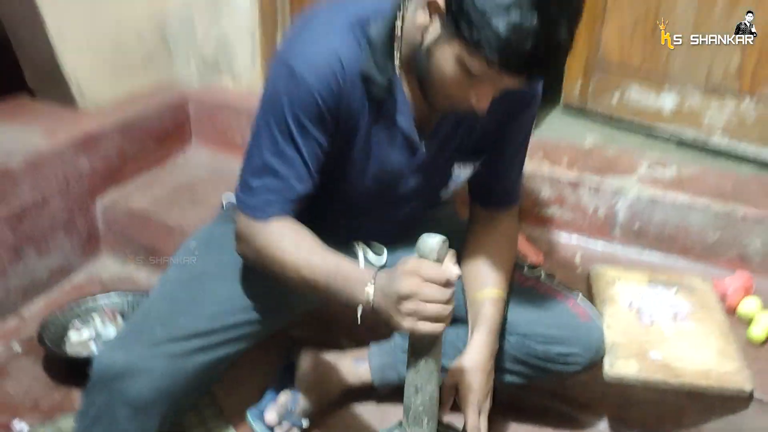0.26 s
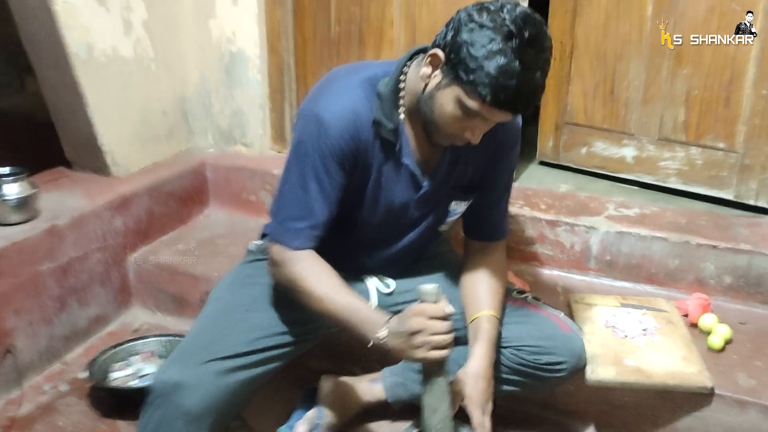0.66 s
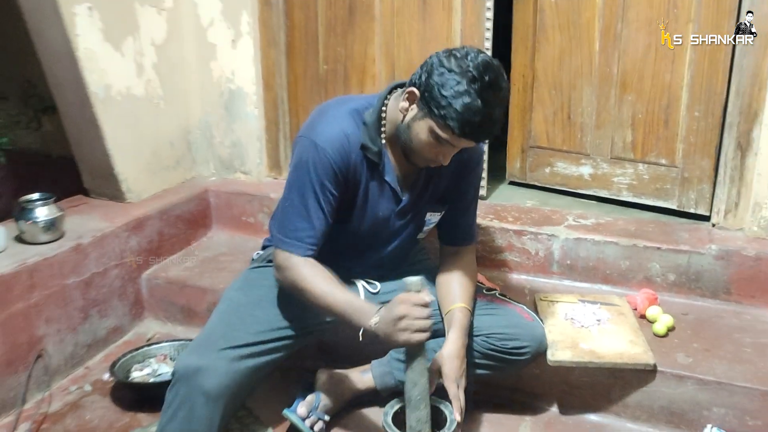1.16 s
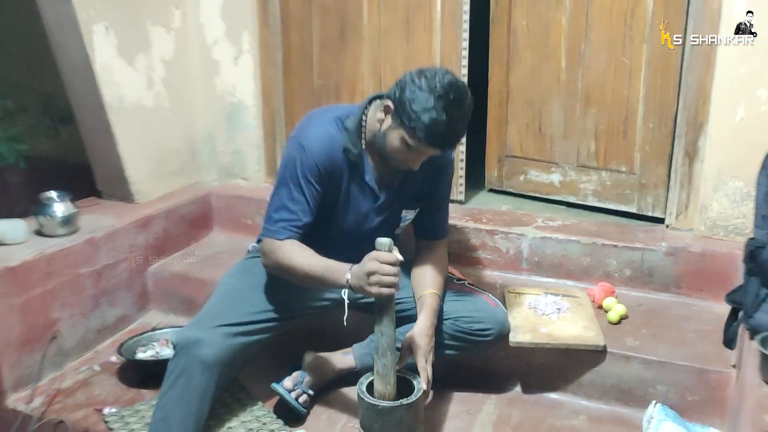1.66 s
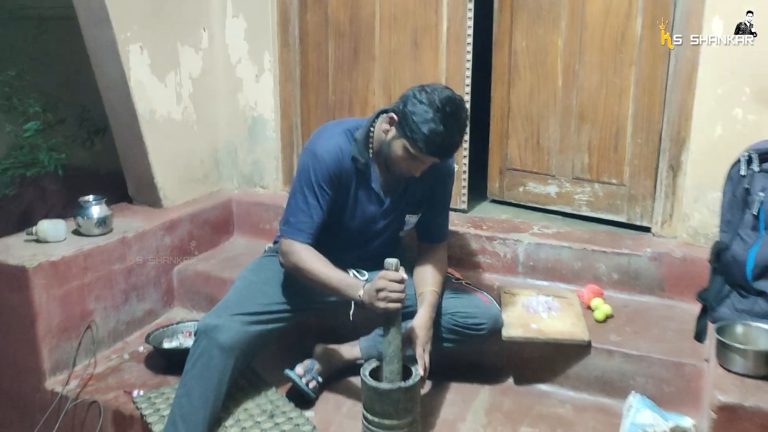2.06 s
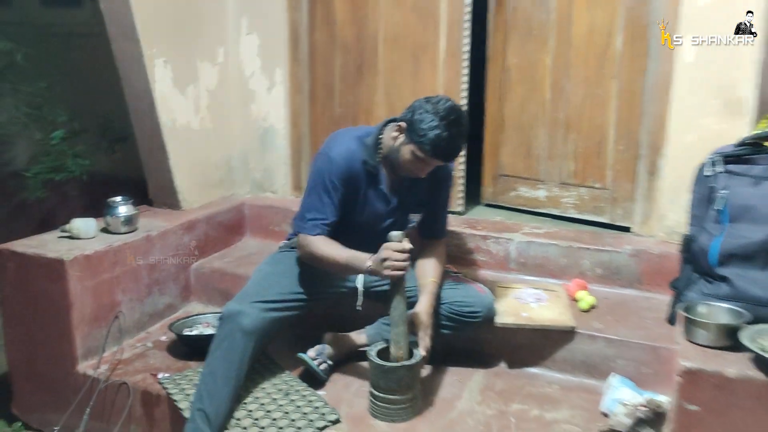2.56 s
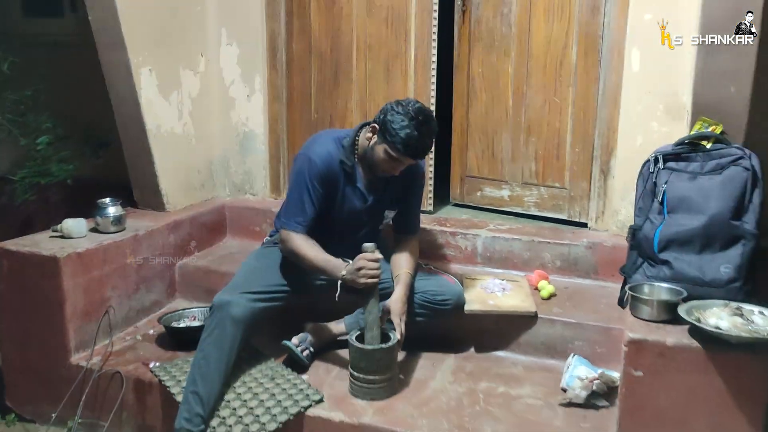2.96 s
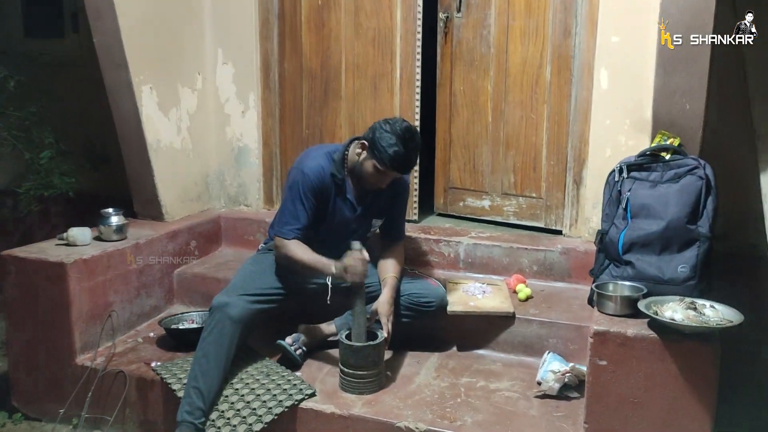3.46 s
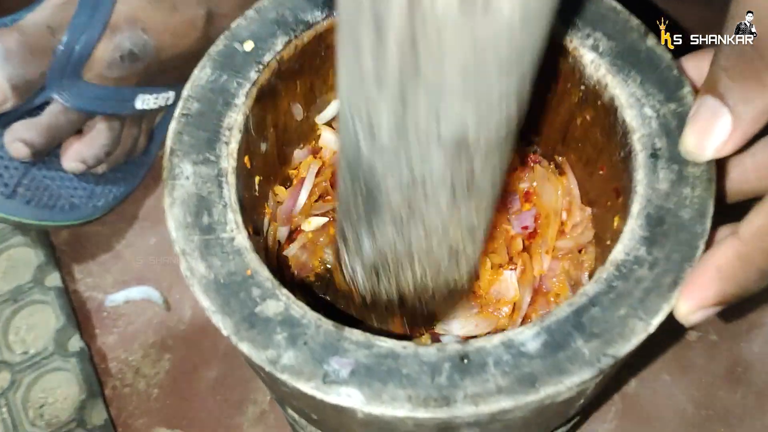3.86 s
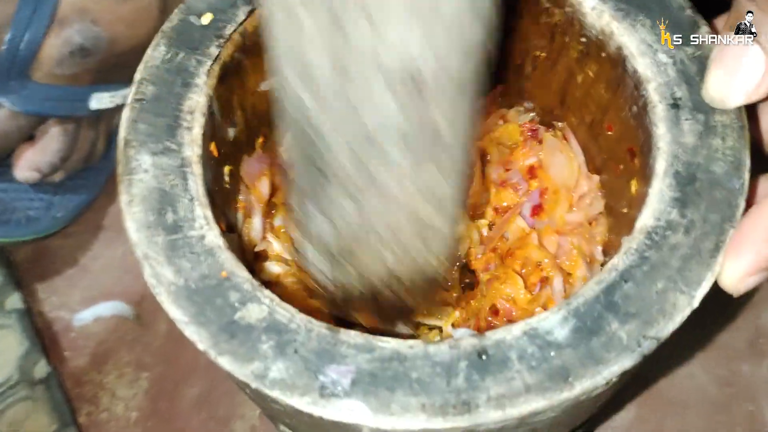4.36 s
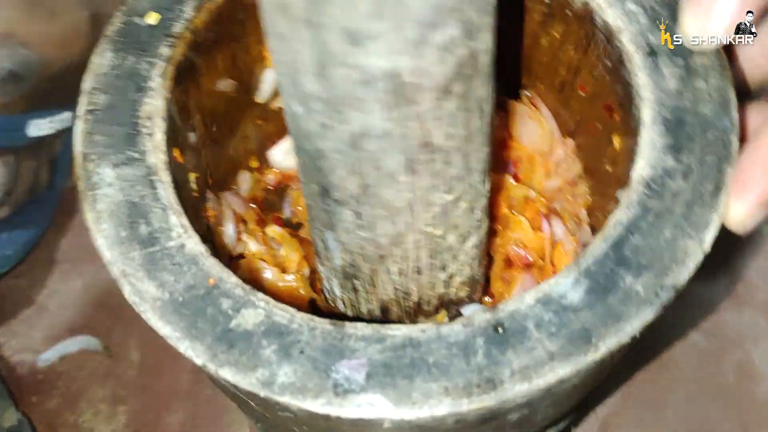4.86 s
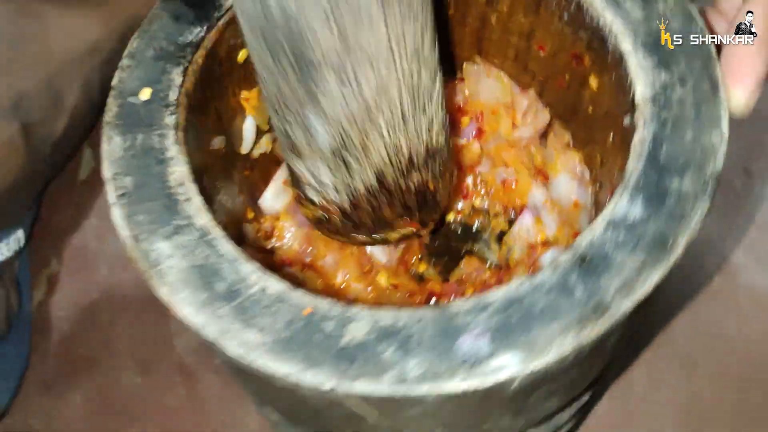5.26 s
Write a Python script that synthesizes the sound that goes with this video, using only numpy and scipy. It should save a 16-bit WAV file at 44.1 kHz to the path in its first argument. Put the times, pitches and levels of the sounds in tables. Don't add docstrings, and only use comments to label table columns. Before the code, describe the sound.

Steady hollow pounding of wood in stone with faint crickets, a short cut to silence, then close crunchy, wet thuds beside a trilling cricket.

```python
import sys
import numpy as np
from scipy import signal
from scipy.fft import rfft, irfft, next_fast_len
from scipy.io import wavfile
from scipy.ndimage import uniform_filter1d

SR = 44100
rng = np.random.default_rng(int(sys.argv[2]) if len(sys.argv) > 2 else 0)


def elevation(decibels):
    levels = np.asarray(decibels, float)
    return 10 ** (levels / 20)


def dump(signal):
    limited = np.clip(np.atleast_2d(signal).T, -1, 1)
    pcm = np.round(limited * 32767).astype(np.int16)
    wavfile.write(sys.argv[1], SR, pcm)


N = 242991
CUT_S, BACK_S = 3.665, 3.909


def read(points, hz):
    f, value = np.transpose(points)
    return np.interp(np.log(hz + 1), np.log(f + 1), value)


def evened(x):
    return x / np.sqrt(np.mean(x ** 2) + 1e-20)


def add(mix, s, sound):
    part = mix[..., round(s * SR):][..., :sound.shape[-1]]
    part += sound[..., :part.shape[-1]]


def pan(db):
    return elevation([[db / 2], [-db / 2]])


def colour(x, db_at):
    size = next_fast_len(x.shape[-1])
    return irfft(rfft(x, size) * elevation(db_at(np.fft.rfftfreq(size, 1 / SR))), size)[..., :x.shape[-1]]


def band(hz, width_hz):
    size = next_fast_len(N, True)
    a, b = rng.standard_normal((2, 2, size // 2 + 1))
    response = 1 / (1 + ((np.fft.rfftfreq(size, 1 / SR) - hz) / width_hz) ** 2)
    return evened(irfft((a + 1j * b) * response, size)[:, :N])


# f/Hz, spectral density/dB
FAR_AIR = [(15, -54), (25, -28.5), (141, 6.5), (427, -9.5), (714, -1.5), (796, -12.5), (887, -9.5),
           (1230, -16), (1840, -16.5), (2110, -16.5), (6920, -26.5), (8830, -18.5), (10700, -26.5),
           (13200, -26), (16000, -27.5)]
NEAR_AIR = [(15, -47.5), (25, 1.5), (102, 6), (384, -5), (936, -15), (4490, -19.5), (5430, -23.5),
            (6050, -19), (14800, -23), (16000, -51)]
# t/s, level/dB
AIR_SWELL = [
    [(0, -43), (.12, -55.5), (.4, -53), (.9, -53), (1.8, -56.5), (2.1, -52.5), (2.4, -57.5), (2.75, -56),
     (3.0, -54), (3.3, -57.5), (3.66, -51)],
    [(3.91, -59), (4.05, -59.5), (4.25, -56.5), (4.78, -56), (5.3, -54), (5.51, -41)],
]
FAR_RUMBLE_DB, NEAR_RUMBLE_DB = -52, -49
RUMBLE_FOLLOWS = 0.47
BASS_LATE_DB, BASS_LATE_S = -12, .17
GAP_DB, GAP_BELOW = -13, -1.45


def yard():
    frames, hz = N // 256 + 5, np.fft.rfftfreq(1024, 1 / SR)
    a, b, patches = rng.standard_normal((3, 2, frames, 513)).transpose(0, 1, 3, 2)
    holes = evened(uniform_filter1d(uniform_filter1d(patches[1], size=9, axis=0), size=9, axis=1))
    holes = holes < GAP_BELOW
    patches = evened(uniform_filter1d(uniform_filter1d(patches[0], size=14, axis=0), size=10, axis=1))
    field, t = np.zeros((513, frames)), np.arange(frames) * 256 / SR
    far = t < CUT_S + .1
    views = (FAR_AIR, AIR_SWELL[0], FAR_RUMBLE_DB, far), (NEAR_AIR, AIR_SWELL[1], NEAR_RUMBLE_DB, ~far)
    for shape, rows, rumble_db, here in views:
        s, hiss_db = np.transpose(rows)
        traffic_db = rumble_db + RUMBLE_FOLLOWS * (hiss_db + 55)
        for part, level_db in ((hz < 1000, traffic_db), (hz >= 1000, hiss_db)):
            tone = part * elevation(read(shape, hz))
            field += np.outer(tone / np.linalg.norm(tone), here * elevation(np.interp(t, s, level_db)))
    late = (t > CUT_S) * np.clip(1 - (t - BACK_S) / BASS_LATE_S, 0, 1) ** .5
    late_db = BASS_LATE_DB * np.outer(hz < 190, late)
    field *= elevation(3.0 * patches + late_db + GAP_DB * holes * (hz > 4000)[:, None])
    return signal.istft((a + 1j * b) * field, nperseg=1024, noverlap=768)[1][:, :N]


# t/s, length/s, level/dB
LOW_SONG = [
    (0, 0.72, -67.5),
    (5.277, 0.072, -56),
    (5.43, .04, -64),
]
MID_SONG = [(2.13, 0.24, -68), (2.36, .08, -66), (2.65, 0.12, -84), (2.82, 0.26, -69), (3.01, 0.12, -67),
            (3.15, 0.205, -66), (3.48, 0.15, -69), (3.962, .05, -69), (4.19, 0.12, -66)]
HIGH_SONG = [
    (1.765, .1, -59),
    (3.14, 0.13, -63),
    (5.273, 0.11, -52),
]
# t/s, length/s, level/dB
SWISHES = [(1.437, 0.079, -56), (1.672, 0.093, -59), (2.34, 0.081, -61.5), (2.42, 0.069, -59),
           (2.615, .07, -62), (2.69, 0.074, -59), (2.905, 0.082, -63), (2.986, 0.055, -57),
           (3.51, 0.063, -62)]
# t/s, length/s, level/dB
DRONE = [
    (3.91, 0.07, -62),
]
WHINE = [
    (4.43, 0.067, -53.5),
]
# f/Hz, width/Hz, left-right level/dB
VOICES = [
    (7030, 250, 8),
    (7850, 60, 9),
    (9300, 220, 3),
    (13000, 800, 2),
    (494, 22, 0),
    (1126, 42, 0),
]
# f/Hz, width/Hz, level/dB, pulse rate/Hz, end t/s
TRILL = (5480, 90, -61, 46, 5.09)


def crickets():
    out, t = np.zeros((2, N)), np.arange(N) / SR
    for rows, (hz, width_hz, pan_db) in zip((LOW_SONG, MID_SONG, HIGH_SONG, SWISHES, DRONE, WHINE), VOICES):
        swell = np.zeros(N)
        for s, length, db in rows:
            add(swell, s, elevation(db) * np.sin(np.pi * np.clip(t[:SR // 2] / length, 0, 1)) ** .6)
        out += band(hz, width_hz) * swell * pan(pan_db)
    hz, width_hz, db, rate, until = TRILL
    drift = 1.5 * evened(uniform_filter1d(rng.standard_normal(N), size=1500))
    pulses = 1 + .5 * np.sin(2 * np.pi * rate * t + drift)
    wing = 1.25 * np.sin(2 * np.pi * hz * t + 2 * drift) + .3 * band(hz, width_hz)
    heard = (t > BACK_S) * np.clip((until - t) / .05, 0, 1)
    return out + wing * pulses * elevation(db) * pan(4) * heard


# f/Hz, t60/s
PORCH = [(100, 0.48), (250, 1), (700, 0.35), (1500, 0.72), (3000, 0.035), (6000, 0.067), (12000, 0.21)]


def porch(x, early_db, late_db):
    size = SR // 2
    taps = np.zeros((2, size))
    slots = np.arange(60, size - 20, 20)
    at = slots + rng.integers(0, 20, (2, len(slots)))
    np.put_along_axis(taps, at, rng.choice([-1., 1.], at.shape), 1)
    early = taps * elevation(-60 * np.maximum(np.arange(size) / SR - .02, 0) / 0.079)
    hz, t, z = signal.stft(taps, SR, nperseg=256)
    late = signal.istft(z * elevation(-60 * t / read(PORCH, hz)[:, None]), SR, nperseg=256)[1][:, :size]
    tail = elevation(early_db) * early / np.linalg.norm(early[0])
    tail = tail + elevation(late_db) * late / np.linalg.norm(late[0])
    return signal.fftconvolve(x, tail, axes=1)[:, :N]


# f/Hz, width/Hz, level over the shudder/dB, t60 ratio to the shudder
HUM = (713, 61, -1.5, 2)


def hum():
    hz, width_hz, over_db, longer = HUM
    level, t = np.zeros(N), np.arange(SR // 2) / SR
    for s, db, t60, _ in SHUDDERS:
        add(level, s, elevation(db + over_db - 60 * t / (longer * t60)) * (1 - np.exp(-t / 0.018)))
    return level * band(hz, width_hz) * (np.arange(N) < BACK_S * SR)


def click(noise, hz, steep):
    return evened(colour(noise, lambda f: -steep * np.log2((f + 1) / hz) ** 2))


# t/s, level/dB, f/Hz, left-right level/dB
SNAPS = [(0.0538, -20.5, 2400, -20), (0.0548, -12, 506, -12.5), (4.501, -24.5, 780, 13),
         (4.259, -37, 650, -4), (0.2359, -32, 7850, -18), (0.5425, -18, 2900, -6),
         (0.5653, -20.5, 2900, -7), (1.0734, -25.5, 3100, 8), (1.8255, -26, 2080, -22),
         (1.9437, -14.5, 9400, -23.5), (1.9589, -22.5, 3100, -11), (1.9723, -30, 3950, -18),
         (2.07, -31.5, 9100, -30), (3.1694, -26, 9300, 0), (4.1454, -18, 3200, 2), (4.2523, -19, 3100, 7),
         (4.271, -22, 3747, 1), (4.5011, -18, 3460, -2), (4.6324, -25, 4030, 6), (4.6647, -21, 5400, -2),
         (4.7174, -31, 5360, -8), (4.8095, -25, 5400, 1), (4.8503, -45, 3730, -1), (4.8753, -5.5, 8070, -9),
         (4.9427, -12.5, 6260, -2), (5.444, -38, 7430, 7)]


def snaps():
    out, t = np.zeros((2, N)), np.arange(600) / SR
    for (s, db, hz, pan_db), noise in zip(SNAPS, rng.standard_normal((len(SNAPS), 2, 600))):
        steep = 13 if s < CUT_S and hz < 4000 else 3.5
        decay = elevation(db - 6.0 - 60 * t * 120) * (1 - np.exp(-t / 0.00182))
        add(out, s, click(noise, hz, steep) * decay * pan(pan_db))
    return out


# t/s, level/dB, f/Hz, left-right level/dB
TICKS = [(4.0593, -33, 2500, -3), (4.0902, -28, 3200, -1), (4.0962, -22.5, 5000, -3),
         (4.1135, -20, 6000, -3), (4.317, -46, 10500, -2), (4.3255, -32, 12500, 0), (4.3317, -31, 7000, -1),
         (4.3385, -24, 6500, -4), (4.3485, -28, 7000, -2), (4.3765, -44, 10500, 0),
         (4.5801, -30.5, 10500, -9), (4.6061, -22, 9300, -9), (4.6116, -20.5, 8600, -10),
         (4.6172, -23.5, 13500, -2), (4.6328, -29, 8000, -2), (4.8615, -29, 6000, -5),
         (5.0605, -28, 12000, -7), (5.1119, -37, 4000, -2), (5.1309, -31, 8500, -3),
         (5.2661, -33, 9000, -2), (5.3698, -16, 6000, -4), (.6885, -34, 4200, 3), (1.018, -30.5, 4300, 0),
         (1.5885, -30, 4600, 4), (4.4998, -33, 9000, -2), (4.506, -40, 9000, 0), (4.875, -22, 9000, -4),
         (.7335, -30, 9000, 0), (1.9437, -28, 11000, -15), (5.18, -35, 3500, 0), (5.2135, -33, 8800, -2),
         (5.24, -35, 3000, 0), (5.4711, -32, 13500, 2), (.0538, -33, 12000, -10), (.2359, -42, 11000, -10),
         (.5422, -46, 10000, 0), (1.8255, -40, 3000, -15)]
TICK_RISE_S, TICK_T60_S = 0.00043, .012
CONTACT_DB, CONTACT_HZ = -1, 2700


def ticks():
    out, t = np.zeros((2, N)), np.arange(600) / SR
    contacts = [(s, db + knock_db + CONTACT_DB, CONTACT_HZ, 0) for s, db, _, _, knock_db in FAR_BLOWS]
    rows = [*TICKS, *contacts]
    for (s, db, hz, pan_db), noise in zip(rows, rng.standard_normal((len(rows), 2, 600))):
        steep = 12 if s < CUT_S and hz < 6000 else 5
        decay = elevation(db - 2.0 - 60 * t / TICK_T60_S) * (1 - np.exp(-t / TICK_RISE_S))
        add(out, s, click(noise, hz, steep) * decay * pan(pan_db))
    return out


# centre t/s, level/dB, f/Hz, half length/s
POPS = [(4.114, -19, 720, .0012), (4.3503, -13, 760, .0009), (4.366, -27, 800, .0015),
        (4.6282, -12, 700, .0008), (4.612, -25, 700, .004), (4.817, -23, 620, .002),
        (5.0635, -14, 640, .001), (5.142, -29, 800, .004), (2.181, -18, 600, .001), (2.471, -17, 800, .001),
        (.1825, -16, 700, .001), (3.3495, -15, 750, .0008)]


def pops():
    out, t = np.zeros(N), np.arange(-1500, 1500) / SR
    for s, db, hz, half in POPS:
        add(out, s + t[0], elevation(db) * np.cos(2 * np.pi * hz * t) * np.exp(-.5 * (t / half) ** 2))
    return out


# t/s, f/Hz, level/dB, t60/s
FREE_MODES = [(.688, 2404, -30.5, 0.086), (.688, 3660, -35, 0.069), (.734, 3950, -35, 0.043),
              (1.018, 3800, -33.5, 0.078), (1.301, 1574, -27.5, 0.13), (1.3, 3800, -45, 0.12),
              (1.588, 1041, -24, 0.094), (1.588, 4250, -42, .05), (1.588, 5140, -44, .04),
              (1.884, 2340, -32.5, 0.12), (2.181, 1030, -29, 0.094), (2.475, 2740, -38, .65),
              (2.47, 1040, -39, 0.48), (3.349, 2800, -38, .15), (3.626, 2856, -32, .2)]
FREE_WIDTH = .02


def free_modes():
    out, t = np.zeros((2, N)), np.arange(SR // 3) / SR
    f = np.fft.rfftfreq(len(t), 1 / SR)
    for (s, hz, db, t60), (a, b) in zip(FREE_MODES, rng.standard_normal((len(FREE_MODES), 2, 2, len(f)))):
        response = 1 / (1 + ((f - hz) / (FREE_WIDTH * hz)) ** 2)
        wood = evened(irfft((a + 1j * b) * response, len(t)))
        add(out, s, wood * elevation(db - 60 * t / t60) * (1 - np.exp(-t / .001)))
    return out * (np.arange(N) < BACK_S * SR)


# t/s, level/dB, t60/s, brightest f/Hz
SHUDDERS = [(0, -51, 0.62, 2180), (0.132, -35.5, 0.098, 1150), (.181, -46, 0.49, 2260),
            (0.466, -56, 0.47, 2430), (0.69, -33.5, 0.064, 2360), (.963, -49, 0.25, 1290),
            (1.018, -45, 0.32, 2830), (1.301, -38.5, 0.44, 2040), (1.588, -50, 0.11, 2280),
            (1.882, -43, 0.4, 2370), (2.18, -34, 0.27, 2170), (2.468, -35, 0.49, 2400),
            (3.059, -21, 0.017, 1700), (3.35, -36.5, 0.31, 1870), (3.625, -35.5, 0.57, 2700),
            (4.112, -40.5, 0.25, 3100), (4.347, -54, 0.1, 1990), (4.626, -47.5, 0.26, 3070),
            (4.872, -49, 0.34, 3500), (5.375, -46, 0.31, 2940)]


def shudder():
    out, t = np.zeros((2, N)), np.arange(SR // 3) / SR
    bands = [elevation(db - 4 * (hz > 3300)) * band(hz, hz / 14) for hz, db, t60 in WOOD]
    for s, db, t60, free_hz in SHUDDERS:
        at = round(s * SR)
        wood = 0
        for noise, (hz, _, _) in zip(bands, WOOD):
            wood = wood + noise[:, at:at + len(t)] * elevation(-55 * np.log2(hz / free_hz) ** 2)
        decay = elevation(db - 60 * t / max(t60, .03)) * (1 - np.exp(-t / 0.0016))
        add(out, s, evened(wood) * decay[:wood.shape[1]])
    return out * (.5 + evened(uniform_filter1d(rng.exponential(1, N) ** 2, size=90)) * 0.79)


# f/Hz, width/Hz, level over the knock/dB, t60/s
CRACK = (1903, 1103, -12.5, 0.19)
# f/Hz, width/Hz, level/dB
GRIT = [(1714, 240, -3.5), (2310, 77, -6.5), (2900, 110, -12.5), (3950, 220, -15)]
GRIT_DB, GRIT_UNEVEN_DB = 3, 9


def cracks():
    hz, width_hz, over_db, t60 = CRACK
    rows, t = [*FAR_BLOWS, *REBOUND], np.arange(SR // 6) / SR
    level = np.zeros((1 + len(GRIT), N))
    for (s, db, _, _, knock_db), luck in zip(rows, rng.random((len(rows), len(GRIT)))):
        shares_db = np.r_[-4, GRIT_DB + np.array(GRIT)[:, 2] + GRIT_UNEVEN_DB * (luck - .5)]
        decay_db = db + knock_db + over_db - 60 * t / t60
        add(level, s, elevation(shares_db[:, None] + decay_db) * (1 - np.exp(-t / 0.00089)))
    grain = uniform_filter1d(rng.exponential(1, N) ** 3, size=60)
    bands = [band(hz, width_hz)] + [band(f, w) for f, w, _ in GRIT]
    return sum(row * b for row, b in zip(level, bands)) * evened(grain)


# t/s, peak level/dB, t60/s
SMACKS = [(0.128, -54, 0.096), (0.18, -46, 0.075), (0.7312, -30.5, 0.13), (1.013, -35.5, 0.1),
          (1.296, -42.5, 0.17), (1.583, -34.5, 0.14), (2.184, -52, 0.11), (2.48, -49, 0.11),
          (3.347, -44.5, 0.2), (4.058, -37.5, 0.021), (4.582, -46, 0.11), (5.058, -42, 0.074),
          (5.466, -40.5, 0.028)]
SMACK_RISE_S, SMACK_HOLD_S = 0.001, 0.0033
# t/s, peak level/dB, rise/s, t60/s
PRESSES = [(2.75, -43, 0.008, 0.2), (3.045, -43.5, 0.012, 0.15), (4.073, -28, 0.027, 0.014),
           (4.242, -55, 0.0042, 0.062), (4.325, -34, 0.011, 0.034), (4.599, -27.5, 0.0076, 0.062),
           (4.833, -29, 0.041, 0.019), (5.096, -36, 0.024, 0.11)]
PRESS_HOLD_S = 0.0082
# t/s, peak level/dB, hold/s, t60/s
SCRAPES = [(0, -64, 0.041, 0.034), (0.449, -38.5, 0.015, 0.26), (0.877, -44, 0.08, 0.32),
           (1.437, -50.5, 0.076, 0.04), (1.866, -42.5, 0.024, 0.22), (1.955, -47.5, 0.054, 0.49),
           (3.53, -54.5, 0.03, 0.16), (4.13, -51, 0.021, 0.24), (5.148, -36.5, 0.11, 0.164),
           (5.363, -25, 0.0055, 0.036), (5.382, -44.5, 0.029, 0.14), (5.483, -27.5, .03, .05)]
SCRAPE_RISE_S = 0.011
SCRAPE_SMOOTH = .4
SMACK_HOLLOW_DB, PRESS_HOLLOW_DB, SCRAPE_HOLLOW_DB = -2, 0.5, -13.5
# f/Hz, spectral density/dB
CRUNCH_COLOUR = [(530, -47), (900, -11.5), (1600, -10), (2300, -2.5), (4360, -6), (5680, -15), (6410, -10),
                 (9650, -8), (11700, -14), (14900, -10), (16000, -36.5)]


def crunch():
    press, hollow, t = np.zeros(N), np.zeros(N), np.arange(SR // 3) / SR
    strokes = [(s, db, SMACK_RISE_S, SMACK_HOLD_S, t60, SMACK_HOLLOW_DB) for s, db, t60 in SMACKS]
    strokes += [(s, db, rise, PRESS_HOLD_S, t60, PRESS_HOLLOW_DB) for s, db, rise, t60 in PRESSES]
    strokes += [(s, db, SCRAPE_RISE_S, hold, t60, SCRAPE_HOLLOW_DB) for s, db, hold, t60 in SCRAPES]
    for s, db, rise, hold, t60, hollow_db in strokes:
        decay = elevation(db - 60 * np.maximum(t - rise - hold, 0) / t60)
        shape = np.minimum(t / rise, 1) ** 2 * decay
        add(press, s, shape)
        add(hollow, s, shape * elevation(hollow_db))
    grains = elevation(4.6 * np.minimum(rng.exponential(1, N), 5)) * (rng.random(N) < 1800 / SR)
    clumps = evened(uniform_filter1d(grains, size=20) + 0.16)
    dragged = hollow < press * elevation((SCRAPE_HOLLOW_DB + SMACK_HOLLOW_DB) / 2)
    smooth = SCRAPE_SMOOTH * dragged
    clumps = (1 - smooth) * clumps + smooth
    hz, frames, z = signal.stft(clumps * rng.standard_normal((2, N)), SR, nperseg=256)
    pockets = rng.standard_normal(z.shape[1:])
    pockets = uniform_filter1d(uniform_filter1d(pockets, size=7, axis=0), size=12, axis=1)
    z = z * elevation(read(CRUNCH_COLOUR, hz)[:, None] + 1.3 * evened(pockets))
    crackle = evened(signal.istft(z, SR, nperseg=256)[1][:, :N])
    return press * crackle + hollow * band(660, 200)


def ring(t, hz, db, t60, turn, sag, soft):
    fall_db = 60 * ((1 - sag) * t / t60 + sag * (t / t60) ** 2)
    return elevation(db - fall_db) * np.sin(2 * np.pi * (hz * t + turn)) * (1 - np.exp(-t * hz / soft)) ** 1.45


# t/s, level/dB, hollow f/Hz, thud into the floor level/dB, knock of the wood level/dB
FAR_BLOWS = [(0.131, -25, 620, -5.5, -13.5), (0.145, -21, 623, -18, -19), (0.181, -7.5, 661, -45, -20),
             (0.194, -9.5, 678, -22.5, -32), (0.466, -19.5, 693, -7, -27), (0.477, -21.5, 642, -46, -21),
             (0.688, -14, 655, -21, -20), (0.702, -10.5, 652, -14, -21), (0.963, -20.5, 669, -15, -18),
             (1.018, -7.5, 683, -11, -30), (1.024, -12.5, 705, -23, -28), (1.302, -7, 726, -15, -15),
             (1.589, -12, 679, -10.5, -15), (1.883, -8.5, 730, -11.5, -19.5), (1.89, -9, 716, -28, -20),
             (2.179, -7, 714, -26, -18), (2.471, -8, 688, -14, -12.5), (2.764, -17.5, 689, -12.5, -22.5),
             (3.054, -24.5, 634, -19.5, -15.5), (3.059, -11, 705.6, -9.5, -20.5),
             (3.349, -10, 718, -16.5, -11), (3.626, -7.5, 720, -20, -19), (3.64, -11, 706, -17.5, -24.5)]
REBOUND = [
    (.7342, -8.5, 725, -15, -25),
]
NEAR_BLOWS = [(4.063, -12, 657, -11, -14), (4.112, -2.5, 723, -17.5, -25), (4.121, -12.5, 641, -5.5, -12),
              (4.349, -6, 750, -11.5, -18.5), (4.364, -9.5, 570, -29.5, -42),
              (4.606, -10.5, 700, -3.5, -29), (4.627, -7, 680, -12, -34), (4.811, -10, 480, -24, -40),
              (4.814, -5, 584, -15.5, -30), (4.872, -20, 540, -5.5, -7), (5.062, -4, 630, -18, -37),
              (5.085, -20, 600, -5.5, -17), (5.14, -20, 792, -14, -14), (5.376, -1.5, 669, -7.5, -19.5),
              (5.395, -13, 483, -42, -22), (5.497, -45.5, 687, -4, 15)]
ROCKS = [(.012, -35, 645, -15, -22.5), (.075, -44, 597, -28, -24.5), (.213, -25, 618, -19, -16),
         (.397, -45, 616, -15, -23), (.741, -16, 718, -15, -34), (.785, -44, 763, -2, -32.5),
         (1.066, -34, 733, -6.5, -20), (1.346, -24, 668, -10, -24), (1.633, -27, 690, -15.5, -31.5),
         (2.2, -15, 722, -20, -16.5), (2.222, -26.5, 685, -14.5, -18.5), (2.484, -14, 705, -25.5, -18.5),
         (2.498, -18.5, 710, -19.5, -22), (2.53, -34, 717, -21, -16.5), (2.58, -31, 715, -8.5, -16),
         (3.085, -26, 712, -6, -27), (3.105, -40, 670, -5.5, -31), (3.368, -17.5, 730, -12.5, -21),
         (3.41, -35, 707, -14, -15.5)]
# ratio to its f, level/dB
WALLS = [(0.742, -9), (0.882, -1.5), (1.078, -5), (1.2, -13.5), (1.46, -8.5)]
# f/Hz, level/dB, t60/s
THUD = [(149, 2, 0.11), (214.1, 12, 0.091), (254.2, 7.5, 0.12), (297.4, 6.5, 0.11), (408.4, -1, 0.21)]
WOOD = [(1184, 4.5, 0.17), (1610, 4.5, 0.15), (1724, 0, 0.24), (2080, -14.5, 0.15), (2360, -4, 0.18),
        (2800, -3.5, 0.23), (3046, -7, 0.29), (3950, -3, 0.15), (5080, -15, 0.15)]


def blows(rows, t60, wall_db, thud_db, wood_db, damp, sag, soft):
    out, t = np.zeros((2, 2, N)), np.arange(SR // 9) / SR
    lucks = rng.random((len(rows), 4, 20))
    for j, ((s, db, hz, low_db, knock_db), luck) in enumerate(zip(rows, lucks)):
        modes = [(hz, 0, t60)] + [(hz * ratio, d + wall_db, t60 * 1.326) for ratio, d in WALLS]
        modes += [(f, d + low_db + thud_db, damp * w) for f, d, w in THUD]
        modes += [(f, d + knock_db + wood_db, damp * w / 4) for f, d, w in WOOD]
        next_s = min([r[0] for r in rows if r[0] > s] + [9]) - s
        choke = elevation(-9 * np.clip((t - next_s + 0.0021) / 0.0017, 0, 1))
        for k, (f, d, w) in enumerate(modes):
            spread = .12 if f < 1200 else .04
            detune = 1 + spread * (luck[0, k] - .5) * (k > 0)
            uneven_db = 4.7 * (luck[1, k] - .5) * (k > 0)
            apart = np.array([[.15], [.15 + .85 * (f > 900) + .2 * (f < 450)]])
            turns = apart * luck[2:, k, None]
            mode = ring(t, f * detune, db + d + uneven_db, w, turns, sag * (k == 0), soft)
            add(out[j % 2], s - 0.0015, mode * choke)
    return out


# f/Hz, coherence
LIKENESS = [(60, 0.81), (150, 0.99), (300, .8), (600, 0.95), (950, 0.47), (2380, 0.0099), (5980, 0.018),
            (15000, 0.01)]


def ports(a, b):
    size = next_fast_len(a.shape[-1])
    same = read(LIKENESS, np.fft.rfftfreq(size, 1 / SR))
    za, zb = rfft(a, size), rfft(b, size)
    return irfft(np.array([za, same * za + np.sqrt(1 - same ** 2) * zb]), size)[:, :a.shape[-1]]


def scene():
    is_far = np.arange(N) < BACK_S * SR
    far = blows([*FAR_BLOWS, *REBOUND, *ROCKS], t60=0.05, wall_db=-1.0, thud_db=-2.0, wood_db=-0.5,
                damp=0.68, sag=2 / 3, soft=0.93)
    near = blows(NEAR_BLOWS, t60=0.022, wall_db=-4, thud_db=-6.0, wood_db=-4.5,
                 damp=0.58, sag=0.64, soft=1.88)
    bowl = sum(x + porch(x, early_db=-13.0, late_db=-19.5) for x in far) * is_far
    bowl = bowl + sum(x + porch(x, early_db=-12.5, late_db=-28.0) for x in near)
    no_shudder = abs(np.arange(N) / SR - BACK_S - .05) <= .05
    paste = crunch() + hum() + cracks() + shudder() * ~no_shudder
    paste = paste + porch(paste, early_db=-12.5, late_db=-36.5)
    side = elevation(np.outer([.5, -.5], np.where(is_far, 1.3, -.3)))
    around = side * ports(*(bowl + pops() + paste + yard()))
    return around + snaps() + crickets() + ticks() + free_modes()


def band_limit(x):
    return signal.sosfilt(signal.butter(12, 16510, fs=SR, output="sos"), x)


# f/Hz, left-right level/dB
PORTS = [(300, 0.5), (700, 1), (1200, -1), (2400, 0), (4400, 3.5), (6500, 4.5), (8800, -9), (10500, -1.5),
         (14000, 6)]


def record(dry):
    left = colour(dry[0], lambda hz: read(PORTS, hz) / 2)
    right = colour(dry[1], lambda hz: -read(PORTS, hz) / 2)
    x = .66 * np.tanh(np.array([left, right]) / .66)
    x = colour(x, lambda hz: -10 * np.log10((1 + (84 / (hz + 1)) ** 5) * (1 + (hz / 15400) ** 120)))
    t = np.arange(N) / SR
    fade_db = np.interp(t - BACK_S, [0, .045, .055, .1], [-12, -9, -2, 0])
    before = np.clip((CUT_S - t) / 0.0019, 0, 1)
    after = np.clip((t - BACK_S) / 0.002, 0, 1) * elevation(fade_db)
    x = x * (before + after)
    return band_limit(x)


dry = scene()
out = record(dry)
dump(out)
```